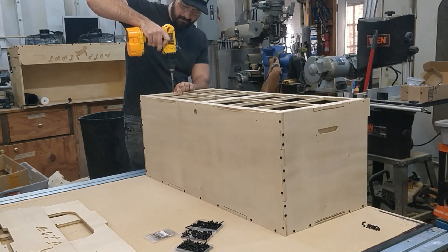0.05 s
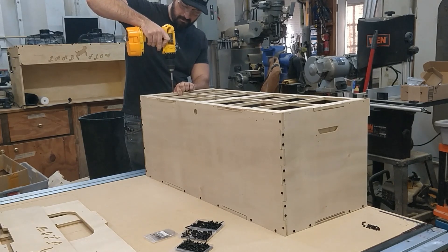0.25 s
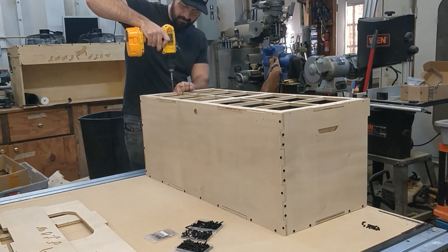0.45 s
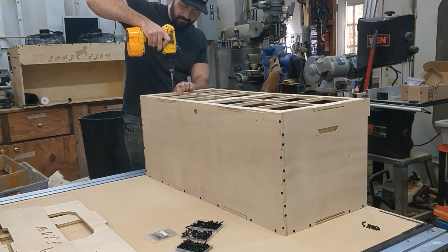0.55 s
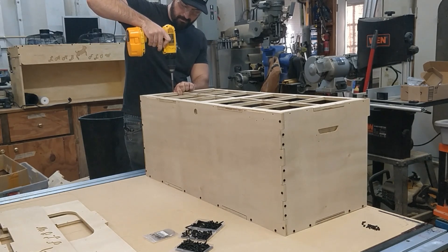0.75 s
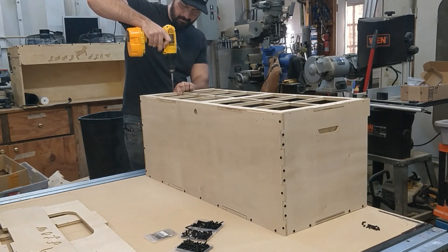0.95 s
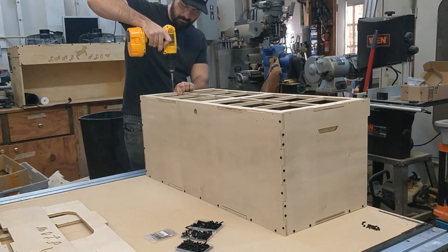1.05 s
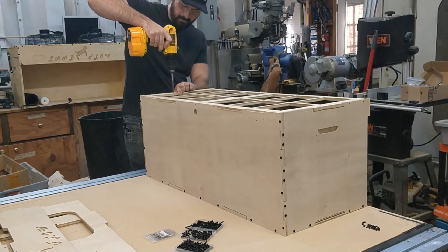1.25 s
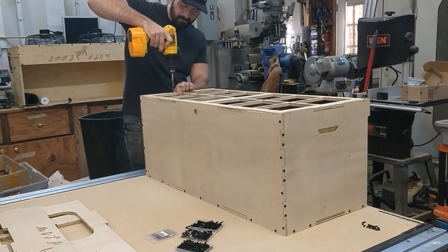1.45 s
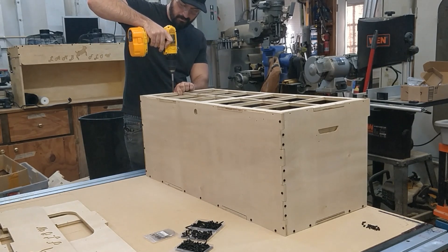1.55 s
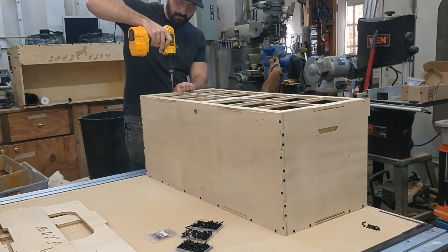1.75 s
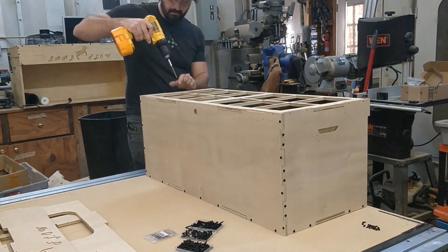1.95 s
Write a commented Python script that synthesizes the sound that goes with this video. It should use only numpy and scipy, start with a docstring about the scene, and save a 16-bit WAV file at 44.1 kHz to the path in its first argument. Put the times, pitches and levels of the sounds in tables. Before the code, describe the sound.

A cordless drill whines shrilly driving a screw into a plywood box, with two hollow thumps

```python
"""A cordless drill drives a screw into a plywood box, a little to the right in a workshop's still air.
As the motor runs up, the speed controller's tone near 4 kHz stumbles and a light blow hits the box.
Then shaft-locked sines carry the work, with brush hiss, screw scrape and gear rattle as shaped noise.
Twice the bit slips: noise cracks and decaying panel modes thump the box, lighter blows following.
The whine surges under load until the drill runs down and a short noise burst ticks at the trigger."""
import sys
import numpy as np
from scipy import signal
from scipy.fft import rfft, irfft
from scipy.io import wavfile
from scipy.ndimage import uniform_filter1d

SR = 44100
rng = np.random.default_rng(int(sys.argv[2]) if len(sys.argv) > 2 else 0)


def master_out(mix):
    """Clip the mix to full scale and print it as 16-bit PCM to the path in sys.argv[1]."""
    frames = np.transpose(np.atleast_2d(mix))
    ceiling = np.clip(frames, -1, 1)
    pcm = np.round(ceiling * 32767).astype(np.int16)
    wavfile.write(sys.argv[1], SR, pcm)


N = 88200
T = np.arange(N) / SR  # time [s]

# noise of the running drill, before each layer's gain:
# (time [s], brush hiss level [dB], screw scrape level [dB], gear rattle level [dB])
RUNNING_LEVELS = [(0, -84, -84, -76), (0.05, -75, -69, -74), (0.12, -74, -73, -65), (0.2, -60, -57.5, -53),
                  (0.26, -57, -62, -54.5), (0.43, -52, -54, -53), (0.87, -49, -50.5, -50.5),
                  (1.6, -50.5, -48.5, -50), (1.735, -55, -52.5, -47.5), (1.775, -72, -64, -54.5),
                  (1.85, -84, -65.5, -61.5), (1.94, -82.5, -78.5, -73.5)]
# spectrum of the brush hiss, also of the trigger: (frequency [Hz], relative density [dB per Hz])
BRUSH_SPECTRUM = [(4000, -49), (8900, -25), (9700, -3.5), (11700, -1), (14400, 4.5), (15700, 2)]
# spectrum of steel scraping in the screw head: (frequency [Hz], relative density [dB per Hz])
SCRAPE_SPECTRUM = [(2500, -41), (3700, -0.5), (4200, 3), (4900, 2), (5450, -4.5), (6100, -5.5),
                   (8100, -8.5), (8800, -23.5), (9800, -12.5), (15000, -21.5)]
# left minus right level [dB]
BRUSH_PAN_DB, SCRAPE_PAN_DB, GEARS_PAN_DB, BOX_PAN_DB = -25.5, -2, -6.5, -6


def amp(db):
    """Decibel law: 20 dB is a factor of ten in amplitude."""
    return 10 ** (np.asarray(db) / 20)


def unit(x):
    """Normalisation to an rms of 1 over all channels."""
    return x / np.sqrt(np.mean(x ** 2) + 1e-20)


def curve(table, axis=1):
    """Linear interpolation in time of one column of a table."""
    rows = np.array(table)
    return np.interp(T, rows[:, 0], rows[:, axis])


def swell(table):
    """Sine-squared easing of the gain from point to point: round tops and narrow dips."""
    seconds, db = np.transpose(table)
    index = np.arange(len(seconds))
    place = np.interp(T, seconds, index)
    eased = np.floor(place) + np.sin(np.pi / 2 * (place % 1)) ** 2
    return np.interp(eased, index, amp(db))


def colour(x, points):
    """Linear filtering: weights the spectrum by a curve on a log-frequency axis, then sets rms 1."""
    hz, db = np.transpose(points)
    log_f = np.log(np.fft.rfftfreq(N, 1 / SR) + 1)
    gain = amp(np.interp(log_f, np.log(hz), db))
    return unit(irfft(rfft(x) * gain, N))


def wander(hz):
    """Low-passed Gaussian noise of rms 1: random drift, its amplitude spectrum halved at hz."""
    f = np.fft.rfftfreq(N, 1 / SR)
    return unit(irfft(rfft(rng.standard_normal(N)) / (1 + (f / hz) ** 2), N))


def pan(db):
    """Intensity stereo: left and right gains of mean 1 from a level difference."""
    ratio = amp(np.atleast_1d(db))
    return 2 * np.array([ratio, np.ones_like(ratio)]) / (1 + ratio)


def pair(x, same):
    """Interchannel correlation: mixes two unrelated channels so that they correlate by same."""
    left = same * x[1] + np.sqrt(1 - same ** 2) * x[0]
    return np.array([left, x[1]])


def noise(same):
    """White Gaussian noise on two channels, correlated by same."""
    return pair(rng.standard_normal((2, N)), same)


def decay(start, t60):
    """Exponential decay: a jump to 1 at the start, then 60 dB lost in t60 seconds."""
    return (T >= start) * amp(-60 * np.maximum(T - start, 0) / t60)


def patchy(x):
    """Time-frequency modulation: regions of a noise swell and fade, alike in both channels."""
    patch_db = 2  # rms swing
    z = signal.stft(x, nperseg=512)[2]
    field = rng.standard_normal(z.shape[1:])
    field = uniform_filter1d(field, size=4, axis=0)  # across frequency
    field = unit(uniform_filter1d(field, size=8, axis=1))  # across time
    return unit(signal.istft(z * amp(patch_db * field), nperseg=512)[1][:, :N])


def still_air():
    """Stationary ambient noise: the still air of the workshop, strongest in the bass."""
    # spectrum of the air: (frequency [Hz], relative density [dB per Hz])
    air_spectrum = [(15, 7.5), (32, -3.5), (55, 0), (130, -19), (195, -7), (280, -25.5), (500, -19),
                    (1200, -34), (15000, -54)]
    return colour(noise(same=0.81), air_spectrum) * amp(-55.5) * pan(db=-5.5)


def trigger():
    """Impulsive excitation: a thin, quickly decaying noise tick as the switch lets go."""
    start_s, t60_s, gain_db = 1.835, 0.039, -56.5
    burst = colour(noise(same=0.17), BRUSH_SPECTRUM) * decay(start_s, t60_s)
    return burst * amp(gain_db) * pan(BRUSH_PAN_DB)


def slip():
    """Sudden release: the steel bit snaps out of the screw head in a short noise burst."""
    start_s, t60_s, gain_db = 1.387, 0.024, -31
    burst = colour(noise(same=0.38), SCRAPE_SPECTRUM) * decay(start_s, t60_s)
    return burst * amp(gain_db) * pan(SCRAPE_PAN_DB)


def knock(start, thump_db, crack_db):
    """Modal response: a crack with its room tail, panels swelling into a thump, and the shop's boom."""
    # modes of the plywood box: (frequency [Hz], relative level [dB], t60 [s])
    box_modes = [(72.1, -15.5, 0.27), (108, -12.5, 0.076), (147.4, -13, 0.211), (191, -2, 0.17),
                 (230, -12, 0.083), (463.5, -22, 0.19)]
    # boom of the workshop after a blow: (frequency [Hz], relative density [dB per Hz])
    boom_spectrum = [(35, -24), (72, 3.5), (105, -8), (150, -8), (200, 4), (280, -13), (3000, -87)]
    # splintery crack of a blow: (frequency [Hz], relative density [dB per Hz])
    crack_spectrum = [(40, 3), (80, 11), (220, 8.5), (370, -6), (490, 5), (850, -11.5), (1400, -10),
                      (2300, -18.5), (4800, -16), (8500, -30.5)]
    rise_s = .011
    box_db, boom_db, boom_t60_s = -14, -39, 0.87
    crack_gain_db, crack_t60_s = -29.5, 0.18
    tail_db, tail_t60_s = -5.5, 0.68  # level relative to the crack
    t = np.maximum(T - start, 0)
    ring = 0
    for hz, db, t60 in box_modes:
        # the sines cross zero together one rise time after the blow
        ring = ring + amp(db) * decay(start, t60) * np.sin(2 * np.pi * hz * (t - rise_s))
    boom = colour(noise(same=1.0), boom_spectrum) * decay(start, boom_t60_s) * amp(boom_db)
    rise = 1 - np.exp(-(t / rise_s) ** 2)
    thump = (ring * amp(box_db) + boom) * rise * amp(thump_db)
    fade = decay(start, crack_t60_s) + amp(tail_db) * decay(start, tail_t60_s)
    crack = colour(noise(same=0.67), crack_spectrum) * fade * amp(crack_gain_db + crack_db)
    return (thump + crack) * pan(BOX_PAN_DB)


def blows():
    """Superposition of light and heavy blows on the box."""
    # blows: (time [s], thump level [dB], crack level [dB]), before the gains of a knock
    blow_table = [(0.219, -20.5, -20.5), (1.002, -1, -2), (1.074, -15, -11), (1.382, 3, -3),
                  (1.447, -8.5, -17.5)]
    return sum(knock(*row) for row in blow_table)


def whine():
    """Frequency modulation and multipath fading: a switching tone that stumbles, surges and flutters."""
    # unsteadiness, high at the start and under load: (time [s], roughness [0-1])
    roughness = [(0.05, 0.85), (0.18, 0.72), (0.23, 0.16), (0.95, 0.22), (1.27, 0.3), (1.8, 0.37)]
    # pitch, hunting at the start and sagging under load: (time [s], frequency [Hz])
    pitch = [(0.01, 4120), (0.047, 4410), (0.06, 4030), (0.09, 4170), (0.18, 4041), (0.23, 4119),
             (0.9, 4154), (1.1, 4117), (1.22, 4042), (1.58, 4117), (1.7, 4080)]
    # level on each side as the drill moves, before the common gain: (time [s], level [dB])
    left_level = [(0.055, -62), (0.08, -47), (0.19, -50), (0.235, -39), (0.31, -47.5), (0.55, -58),
                  (0.62, -45.5), (1.3, -41), (1.6, -43), (1.75, -51), (1.8, -90)]
    right_level = [(0.008, -82), (0.02, -47.5), (0.058, -51.5), (0.08, -38), (0.108, -41.5), (0.132, -53),
                   (0.15, -35), (0.168, -53), (0.185, -39), (0.196, -27), (0.208, -38), (0.222, -29.5),
                   (0.26, -29.5), (0.29, -38.5), (0.33, -34.5), (0.72, -34), (0.88, -31), (0.94, -35),
                   (1.09, -34), (1.115, -47), (1.17, -31.5), (1.245, -32.5), (1.26, -44), (1.335, -42.5),
                   (1.353, -28.5), (1.378, -48), (1.45, -49), (1.49, -37.5), (1.578, -52), (1.635, -32.5),
                   (1.663, -39), (1.696, -29), (1.718, -62), (1.795, -42), (1.82, -85)]
    # moments when the pitch dives during the run-up: [s]
    stumbles = [0.13, 0.165]
    stumble_depth_hz, stumble_s = 693, 0.004
    jitter_hz, jitter_rate_hz = 105.8, 142  # rms swing at roughness 1
    echo_width_hz, left_extra_rough = 31, 0.61
    third_db, third_fade_db_per_s, third_width_hz = -12.5, -69, 300
    gain_db, flutter_db, flutter_hz = -2, 5, 46

    rough = np.clip(curve(roughness) + np.array([[left_extra_rough], [0]]), 0, 1)
    dips = sum(np.exp(-abs(T - s) / stumble_s) for s in stumbles)
    jitter = jitter_hz * rough[1] ** 2 * wander(jitter_rate_hz)
    hz = curve(pitch) - stumble_depth_hz * dips + jitter
    phase = 2 * np.pi * np.cumsum(hz) / SR

    # random complex envelopes blur the undisturbed pitch into echoes around the shop
    scatter = np.array([wander(echo_width_hz) + 1j * wander(echo_width_hz) for _ in range(2)])
    carrier = np.exp(2j * np.pi * np.cumsum(curve(pitch)) / SR)
    echoes = (scatter * carrier).real
    direct = np.sqrt(2 * (1 - rough ** 2)) * np.cos(phase)
    tone = direct + rough * echoes

    third_gain = amp(third_db + third_fade_db_per_s * T)
    third_harmonic = np.cos(3 * phase) * third_gain * wander(third_width_hz)
    flutter = flutter_db * rough * np.minimum(wander(flutter_hz), .5)  # dips reach further than rises
    sides = np.array([swell(left_level), swell(right_level)])
    return amp(gain_db + flutter) * sides * (tone + third_harmonic)


def motor(turns):
    """Shaft orders: tones at fixed multiples of the rotation, wavering in level on each side."""
    # gear hum: (time [s], level at five times the speed [dB], level at six times the speed [dB])
    hum_levels = [(0.08, -64.5, -82), (0.19, -74, -54), (0.33, -65, -74), (0.54, -50.5, -67),
                  (0.61, -59, -56.5), (0.8, -66, -52.5), (0.88, -50.5, -72), (1.13, -50, -54),
                  (1.22, -60, -62), (1.33, -52, -56), (1.6, -67, -67), (1.7, -52, -68), (1.9, -73.5, -85)]
    # overtones of the gears: (multiple of the speed, level over the gear rattle column [dB])
    overtone_levels = [(12.5, -13), (25, -12.5), (35, -22)]
    waver_db = 4.5  # rms
    hum = [(5, curve(hum_levels)), (6, curve(hum_levels, axis=2))]
    overtones = [(order, db + curve(RUNNING_LEVELS, axis=3)) for order, db in overtone_levels]
    tones = 0
    for order, db in hum + overtones:
        waver = waver_db * np.array([wander(22), wander(19)])
        tones = tones + amp(db + waver) * np.sin(2 * np.pi * (order * turns + rng.random()))
    return tones * pan(GEARS_PAN_DB)


def rattle(turns, points, same):
    """Shot noise: dense tiny impacts over their blurred echoes, swelling once in each shaft turn."""
    grain_db, grains_per_s = 0.5, 3000  # dB per step of the exponential draw; rate on each side
    grain_share, turn_depth = 0.68, 0.028  # share of the power; depth of the swell
    sizes = amp(grain_db * np.minimum(rng.exponential(1, N), 4))
    hits = sizes * (rng.random(N) < grains_per_s / SR)
    grains = unit(hits * pair(rng.choice([-1., 1.], (2, N)), same))
    drive = np.sqrt(grain_share) * grains + np.sqrt(1 - grain_share) * noise(same)
    turn_swell = 1 + turn_depth * np.cos(2 * np.pi * turns)
    return colour(patchy(drive) * turn_swell, points)


def drill():
    """Common rotation: motor tones, brush hiss, screw scrape and gear rattle share one shaft angle."""
    # motor speed: (time [s], mean speed [turns per s])
    speed = [(0, 112), (0.17, 123.6), (0.38, 117), (0.55, 129.4), (0.7, 131), (0.88, 130.4), (1.3, 124),
             (1.5, 109), (1.72, 88)]
    # spectrum of the gear rattle: (frequency [Hz], relative density [dB per Hz])
    gear_spectrum = [(100, 4.5), (197, 9), (260, 2.5), (380, 1.5), (470, 6), (700, 2.5), (1550, 2.5),
                     (1900, -2), (2900, -3.5), (3300, 4.5), (3600, -4), (6000, -11), (12000, -24.5)]
    speed_jitter = 0.0052  # rms, as a fraction of the speed
    brush_db, scrape_db, gears_db = 5.5, 5, 4  # gains over the running levels
    turns = np.cumsum(curve(speed) * (1 + speed_jitter * wander(19.0))) / SR
    brush = rattle(turns, BRUSH_SPECTRUM, same=.1) * amp(brush_db + curve(RUNNING_LEVELS))
    scrape = rattle(turns, SCRAPE_SPECTRUM, same=0.099) * amp(scrape_db + curve(RUNNING_LEVELS, axis=2))
    gears = rattle(turns, gear_spectrum, same=0.21) * amp(gears_db + curve(RUNNING_LEVELS, axis=3))
    noises = brush * pan(BRUSH_PAN_DB) + scrape * pan(SCRAPE_PAN_DB) + gears * pan(GEARS_PAN_DB)
    return motor(turns) + noises


def scene():
    """Linear superposition of all sources."""
    return still_air() + trigger() + slip() + blows() + whine() + drill()


def record(dry):
    """Band limitation: a linear-phase low-pass filter sets the recorder's upper edge."""
    edge_hz = 15850
    lowpass = signal.firwin(511, edge_hz, window=("kaiser", 9), fs=SR)
    return signal.oaconvolve(dry, lowpass[None], "same")


dry = scene()
out = record(dry)
master_out(out)
```